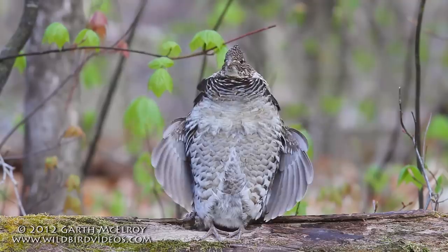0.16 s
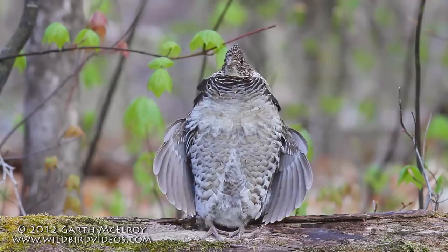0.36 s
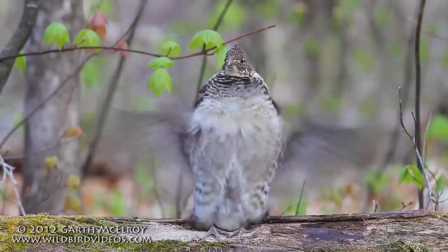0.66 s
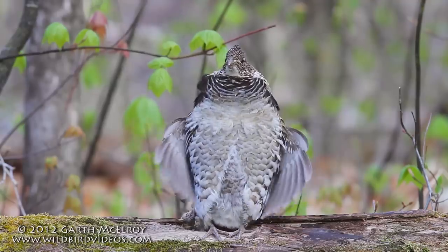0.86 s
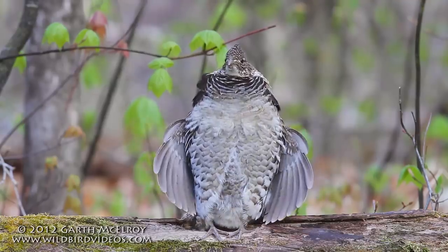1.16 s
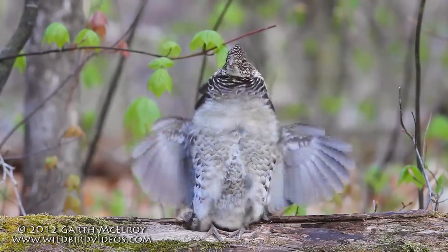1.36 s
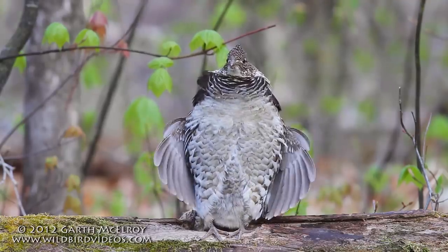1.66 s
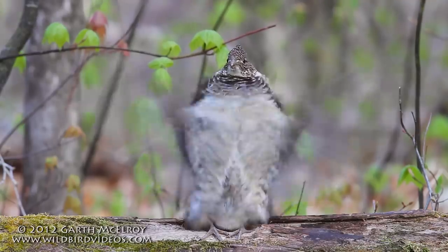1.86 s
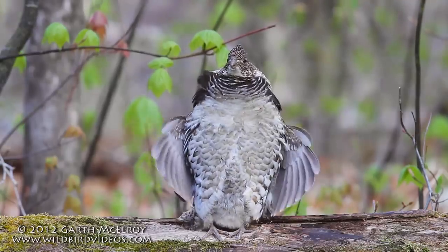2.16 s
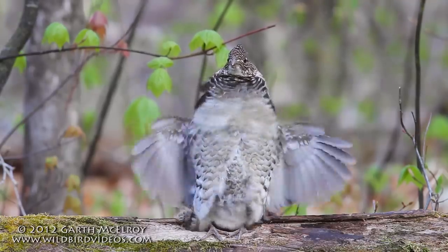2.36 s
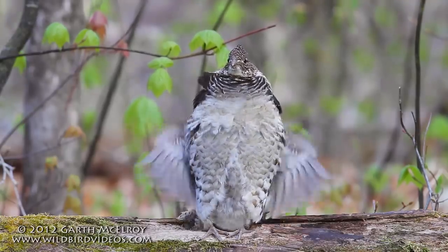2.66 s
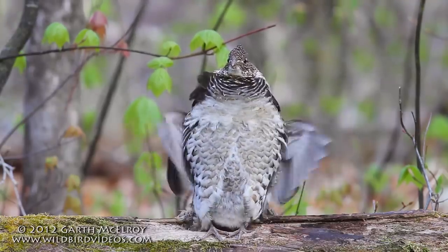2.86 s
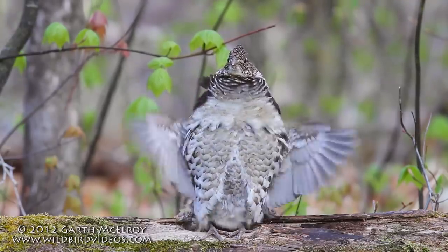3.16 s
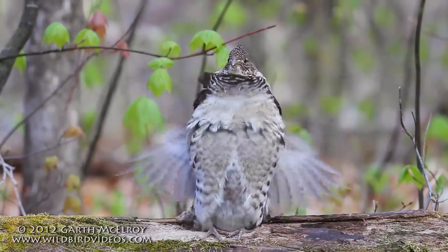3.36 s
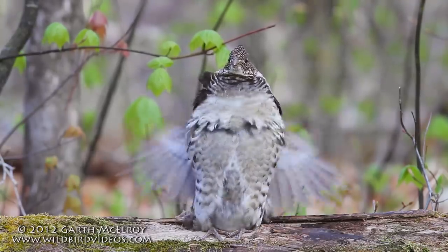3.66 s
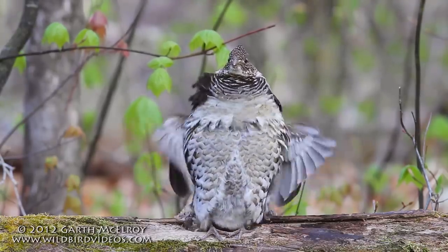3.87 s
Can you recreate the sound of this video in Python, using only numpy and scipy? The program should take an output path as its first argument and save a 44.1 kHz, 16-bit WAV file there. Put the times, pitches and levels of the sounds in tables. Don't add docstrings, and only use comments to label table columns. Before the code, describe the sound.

A grouse beats its wings in low airy thumps with faint feather swishes, the gaps shrinking; much quieter birdsong surrounds it in an echoing spring wood, over soft rumble and hiss, recorded outdoors in stereo.

```python
import sys
import numpy as np
from scipy import signal
from scipy.fft import rfft, irfft
from scipy.io import wavfile
from scipy.ndimage import uniform_filter1d

SR = 44100
rng = np.random.default_rng(int(sys.argv[2]) if len(sys.argv) > 2 else 0)


def rack_gain(trim_db):
    fader = np.asarray(trim_db, float)
    return 10 ** (fader / 20)


def materialize(psi):
    bounded = np.clip(np.atleast_2d(psi).T, -1, 1)
    quanta = np.round(bounded * 32767).astype(np.int16)
    wavfile.write(sys.argv[1], SR, quanta)


N = 176400
WOOD_T60_S = 1.2
PORT_LAG_S = -4.6e-5

# (time [s], thump peak [dB], snap of the stroke [0-1], swish level [dB], slowness [1 = usual])
WING_BEATS = [
    (.7697, -13, .01, -54.5, 1.015),
    (1.4169, -12.3, .2, -55, 1.005),
    (1.9601, -11.5, .6, -53, 1.005),
    (2.4208, -11.3, .85, -52, 1.0),
    (2.8204, -11.9, .35, -50.5, 1.07),
    (3.1803, -12, .55, -53.5, 1.035),
    (3.5054, -11, .99, -51, 1.025),
    (3.8049, -10.8, .99, -50, 1.005),
]
# (frequency [Hz], level [dB])
FEATHER_COLOUR = [(900, -22), (2200, -14), (3800, -0.5), (6000, -5.5), (8700, 3.5), (11000, -3.5),
                  (15500, -15)]


def evened(x):
    return x / np.sqrt(np.mean(x ** 2) + 1e-20)


def read(points, hz):
    f, value = np.transpose(points)
    return np.interp(np.log(hz + 1), np.log(f + 1), value)


def add(mix, s, sound):
    part = mix[round(s * SR):][:len(sound)]
    part += sound[:len(part)]


def slow(rate_hz):
    z = rfft(rng.standard_normal(N))
    return evened(irfft(z / (1 + (np.fft.rfftfreq(N, 1 / SR) / rate_hz) ** 4), N))


def coloured(x, points):
    return evened(irfft(rfft(x) * rack_gain(read(points, np.fft.rfftfreq(N, 1 / SR))), N))


def panned(x, pan_db, lag_s=0):
    late = irfft(rfft(x) * np.exp(-2j * np.pi * np.fft.rfftfreq(N, 1 / SR) * lag_s), N)
    return np.array([late * rack_gain(pan_db / 2), x * rack_gain(-pan_db / 2)])


def wood(x, t60_s, same=0):
    taps = rng.choice([-1., 1.], (3, SR)) * (rng.random((3, SR)) < 1500 / SR)
    t = np.arange(SR) / SR
    taps = np.sqrt(same) * taps[2] + np.sqrt(1 - same) * taps[:2]
    taps *= rack_gain(-60 * t / t60_s) * (t > .02)
    return signal.fftconvolve(x, taps / np.linalg.norm(taps[0]), axes=1)[:, :N]


def wash(points, level_db, patchy_db, swell_db):
    # (frequency [Hz], left-right likeness [-1 to 1])
    likeness = [(60, 0.78), (180, 0.9), (550, 0.2), (1650, 0.54), (4970, 0.11), (15000, -0.084)]
    # (frequency [Hz], left-right level [dB])
    side_lean = [(60, 4), (380, 3.5), (2380, 0.5), (15000, 0.5)]
    frames, hz = N // 256 + 5, np.fft.rfftfreq(1024, 1 / SR)
    a, b, c, d, patches = rng.standard_normal((frames, 513, 5)).T
    patches = uniform_filter1d(patches, size=8, axis=0)
    patches = evened(uniform_filter1d(patches, size=16, axis=1))
    swell = np.resize(slow(2.6)[::256], frames)
    same = np.clip(read(likeness, hz), -1, 1)[:, None]
    lean = rack_gain(read(side_lean, hz) / 2)[:, None]
    left = a + 1j * b
    right = same * left + np.sqrt(1 - same ** 2) * (c + 1j * d)
    z = np.array([left * lean, right / lean])
    z *= rack_gain(read(points, hz)[:, None] + patchy_db * patches + swell_db * swell)
    return rack_gain(level_db) * evened(signal.istft(z, nperseg=1024, noverlap=768)[1][:, :N])


def whistle(start, hz, level_db, waver):
    t, at = np.arange(len(hz)) / SR, round(start * SR)
    drift, flutter = [np.resize(w[at:at + len(hz)], len(hz)) for w in waver]
    fade_s = .16 * t[-1]
    ends = np.clip(np.minimum(t, t[-1] - t) / fade_s, 0, 1)
    turns = np.cumsum(hz + 11 * drift) / SR
    level = rack_gain(level_db + 2.5 * flutter)
    return start, np.sqrt(2) * ends * level * np.sin(2 * np.pi * turns)


def rumble():
    # (frequency [Hz], density [dB per Hz])
    rumble_colour = [(11, -24), (18, 0), (33, -6.5), (92, -1), (175, -10), (317, -19), (861, -25),
                     (1420, -28.5), (1500, -27.5), (1950, -37), (3300, -120)]
    return wash(rumble_colour, -57.5, patchy_db=1.2, swell_db=.3)


def air():
    # (frequency [Hz], density [dB per Hz])
    air_colour = [(880, -58), (1500, -20), (1650, -5), (2650, 0.5), (3480, -6.5), (3620, -7.5),
                  (4530, -7.5), (5510, -17), (15600, -24)]
    return wash(air_colour, -65, patchy_db=2.0, swell_db=-0.02)


def far_chorus(waver):
    low_hz, high_hz = 1920, 3507
    far = np.zeros((2, N))
    for side, when, pitch, bend, length in rng.random((70, 5)):
        top_hz = low_hz * (high_hz / low_hz) ** pitch
        glide = np.linspace(1, 1 + 0.232 * (bend - .6) ** 3, round((0.036 + 0.1675 * length) * SR))
        add(far[int(side * 2)], *whistle(when * (N / SR - .1), top_hz * glide, -8 * bend, waver))
    return rack_gain(-71.5) * evened(wood(far + .5 * far[::-1], WOOD_T60_S))


def birds():
    waver = (slow(30.8), slow(45))
    near = chips(waver) + trills(waver) + songs(waver) + warbles(waver) + buzzes(waver)
    spread = 0.68 * near + 0.49 * near[::-1]
    bushes = rack_gain(-8) * wood(spread, .25)
    trunks = rack_gain(-8.5) * wood(spread, WOOD_T60_S)
    return near + bushes + trunks + far_chorus(waver)


def chips(waver):
    # (time [s], level [dB rms])
    chip_calls = [
        (.035, -79),
        (.495, -75),
        (.905, -78),
        (1.06, -76),
        (1.21, -77),
        (1.64, -80),
    ]
    out, glide = np.zeros((2, N)), np.linspace(6450, 7050, round(.025 * SR))
    for start, level_db in chip_calls:
        add(out[0], *whistle(start, glide, level_db, waver))
    return out


def trills(waver):
    # (time [s], pitch [Hz], level [dB])
    syllable = [
        (0, 6100, -8),
        (.006, 6900, -5),
        (.012, 5900, -1),
        (.024, 5250, 0),
        (.036, 4900, -5),
        (.062, 3650, -3),
    ]
    # (first time [s], last time [s], period [s], level [dB rms])
    runs = [
        (2.49, 2.8, .1003, -77),
        (2.891, 3.99, .1003, -73),
        (.075, .55, .104, -81),
    ]
    out = np.zeros((2, N))
    s, hz, db = np.transpose(syllable)
    t = np.arange(0, s[-1], 1 / SR)
    for first, last, period, level_db in runs:
        for start in np.arange(first, last, period):
            add(out[0], *whistle(start, np.interp(t, s, hz), level_db + np.interp(t, s, db), waver))
    return out


def songs(waver):
    # (time [s], length [s], from [Hz], to [Hz], level [dB rms])
    sparrow_left = [
        (.08, .58, 4480, 4400, -67.5),
    ]
    sparrow_right = [(1.15, .05, 4110, 4100, -67), (1.19, .09, 4060, 3975, -64),
                     (1.26, .26, 3980, 3935, -59.5), (1.5, .14, 3940, 3920, -61),
                     (1.63, .33, 3930, 3925, -69), (1.695, .03, 3370, 3495, -57),
                     (1.72, .145, 3510, 3470, -53), (1.88, .05, 3450, 3525, -57),
                     (1.92, .25, 3540, 3520, -55), (2.17, .09, 3500, 3500, -72),
                     (2.31, .1, 3510, 3500, -70), (3.43, .08, 4180, 4100, -74), (3.55, .1, 4030, 3950, -77),
                     (3.65, .15, 3930, 3900, -75)]
    thrush_right = [(.503, .014, 1580, 2080, -56), (.514, .016, 2050, 2190, -55),
                    (.525, .115, 2192, 2232, -50.5), (.628, .034, 3400, 3400, -52),
                    (.658, .011, 3370, 2860, -49), (.667, .022, 2845, 2830, -54),
                    (.688, .175, 1885, 1860, -54), (.86, .09, 1870, 1870, -59),
                    (2.69, .065, 2640, 2570, -58), (2.76, .055, 2600, 2580, -58),
                    (3.31, .11, 2500, 2480, -57), (3.42, .1, 2490, 2480, -64), (3.41, .02, 2300, 2080, -64),
                    (3.425, .09, 2065, 2055, -59), (3.49, .09, 2055, 2045, -54.5),
                    (3.58, .07, 2050, 2045, -61), (3.585, .025, 3200, 3230, -62),
                    (3.59, .06, 3110, 3140, -60), (3.645, .125, 3150, 3195, -53),
                    (3.86, .14, 2490, 2535, -61), (.16, .45, 3390, 3410, -74), (3.35, .11, 2830, 2825, -67),
                    (3.785, .15, 3185, 3150, -61), (3.94, .05, 3330, 3350, -68)]
    warbler_left = [(1.04, .018, 2600, 2850, -68), (1.052, .016, 2850, 3050, -60),
                    (1.07, .05, 2480, 2330, -62), (1.13, .06, 2300, 2000, -72),
                    (1.63, .03, 2330, 2300, -62), (1.675, .045, 2580, 2583, -56),
                    (1.72, .045, 2590, 2590, -64), (1.835, .062, 2630, 2560, -57),
                    (1.9, .07, 2170, 2160, -62), (1.91, .06, 2590, 2600, -66),
                    (2.205, .02, 2750, 3150, -67), (2.222, .012, 3500, 3480, -64),
                    (2.231, .014, 3350, 2800, -60), (2.245, .028, 2780, 2520, -65),
                    (2.262, .016, 3100, 2900, -63), (2.328, .018, 3100, 2780, -63),
                    (2.362, .027, 3230, 2550, -61), (2.395, .016, 3120, 2880, -66),
                    (2.88, .08, 3450, 3420, -72), (2.99, .015, 3500, 3400, -66),
                    (3.015, .03, 3050, 3180, -70), (3.63, .055, 2620, 2640, -64),
                    (2.965, .03, 2680, 2580, -66), (3.03, .035, 2580, 2580, -67),
                    (3.13, .03, 2590, 2570, -64), (3.1, .02, 2850, 2750, -65), (.36, .057, 2650, 2880, -67),
                    (.5, .09, 2950, 3170, -73), (3.47, .02, 2600, 2650, -62)]
    # (notes, left-right [dB], cut that makes room for the blur [dB])
    singers = [(sparrow_left, 6.5, 2.1), (sparrow_right, -9, 4.2),
               (thrush_right, -9.5, 5.5), (warbler_left, 11, 4.2)]
    out = np.zeros((2, N))
    for song, pan_db, near_db in singers:
        voice = np.zeros(N)
        for start, length, from_hz, to_hz, level_db in song:
            glide = np.linspace(from_hz, to_hz, round(length * SR))
            add(voice, *whistle(start, glide, level_db - near_db, waver))
        out += panned(voice, pan_db)
    return out


def puffs():
    # (time [s], length [s], level [dB])
    gusts = [
        (.48, .03, -55),
        (.57, .035, -52),
        (.68, .03, -57),
        (3.65, .06, -54),
    ]
    t = np.arange(N) / SR
    return slow(13) * sum(rack_gain(db) * np.exp(-.5 * ((t - s) / length) ** 2) for s, length, db in gusts)


def warbles(waver):
    # (time [s], length [s], centre [Hz], level [dB rms], port [0 left, 1 right])
    far_warbles = [
        (.96, .3, 4800, -75, 1),
        (1.22, .2, 5200, -79, 1),
        (.55, 1.3, 6850, -84, 0),
        (2.68, .14, 2760, -62, 1),
        (3.28, .3, 2720, -63, 1),
        (3.84, .16, 2560, -61, 1),
        (3.6, .28, 2780, -66, 0),
        (2.86, .36, 2650, -69, 1),
        (2.87, .14, 3350, -71, 0),
        (1.15, .1, 3300, -68, 1),
    ]
    out, wander = np.zeros((2, N)), slow(62)
    for start, length, centre_hz, level_db, port in far_warbles:
        hz = centre_hz + 140 * wander[:round(length * SR)]
        add(out[port], *whistle(start, hz, level_db, waver))
    return out


def thumps():
    # (delay [ms], pressure share [1 = peak], rise [ms], fall [ms])
    slack_stroke = [
        (-5.7, .21, 6.9, 2.55),
        (.35, -1.02, 4, 3.95),
        (2.9, .57, 3.2, 8.4),
    ]
    snappy_stroke = [
        (-5.1, .21, 7, 2.6),
        (.1, -1.01, 3, 3.75),
        (5.4, .42, 5.7, 6.5),
    ]
    # (delay [s], level [dB])
    echoes = [
        (.0158, -29),
        (.0213, -24),
    ]
    ms, out = np.arange(-800, 800) / SR * 1000, np.zeros(N)
    for s, peak_db, snap, _, slowness in WING_BEATS:
        stroke = (1 - snap) * np.array(slack_stroke) + snap * np.array(snappy_stroke)
        stroke *= [slowness, 1, slowness, slowness]
        phases = []
        for at, share, rise, fall in stroke:
            u = np.clip((ms - at) / np.where(ms < at, rise, fall), -1, 1)
            phases.append(share * np.cos(np.pi / 2 * u) ** 2)
        squeeze, suction, refill = phases
        start = s + ms[0] / 1000
        add(out, start, rack_gain(peak_db) * (squeeze + suction + refill))
        for late, echo_db in echoes:
            add(out, start + late, rack_gain(peak_db + echo_db) * suction)
    out = signal.sosfiltfilt(signal.butter(4, 460, fs=SR, output="sos"), out)
    pair = panned(out, 3, PORT_LAG_S)
    thin = signal.sosfilt(signal.butter(1, 200, "high", fs=SR, output="sos"), pair)
    return pair + rack_gain(-19) * wood(thin, .55, same=0.78)


def swishes():
    # (frequency [Hz], left-right likeness [0-1])
    likeness = [(4000, .8), (9000, .97), (13000, .5)]
    lead_s, rise_s, t60_s, tail_db, tail_t60_s = .0045, .0043, .035, -6, .16
    t, shape = np.arange(N) / SR, np.zeros(N)
    for s, _, _, swish_db, _ in WING_BEATS:
        u = t - s + lead_s
        after = np.maximum(u, 0)
        fall = rack_gain(-60 * after / t60_s) + rack_gain(tail_db - 60 * after / tail_t60_s)
        shape += rack_gain(swish_db - 2.0) * fall * np.exp(np.minimum(u, 0) / rise_s)
    both, left, right = [coloured(rng.standard_normal(N), FEATHER_COLOUR) for _ in range(3)]
    same = np.clip(read(likeness, np.fft.rfftfreq(N, 1 / SR)), 0, 1)
    shared = same * rfft(panned(both, -0.34, PORT_LAG_S))
    separate = np.sqrt(1 - same ** 2) * rfft([0.51 * left, 1.1 * right])
    return irfft(shared + separate, N) * shape * rack_gain(1.5 * slow(300))


def leaf_ticks():
    # (time [s], level [dB], left-right [dB])
    ticks = [
        (.85, -63, 9),
        (2.645, -67, 10),
        (1.8, -69, 8),
    ]
    t, out = np.arange(N) / SR, np.zeros((2, N))
    noise = coloured(rng.standard_normal(N), FEATHER_COLOUR)
    for s, tick_db, pan_db in ticks:
        u = t - s
        out += rack_gain(tick_db) * panned(noise, pan_db) * (u > 0) * np.exp(-abs(u) / 0.00089)
    return out


def buzzes(waver):
    # (time [s], length [s], centre [Hz], level [dB rms])
    buzz_calls = [
        (.975, .085, 3580, -62),
        (1.083, .07, 3600, -63.5),
        (1.17, .06, 3500, -68),
    ]
    swing_hz, swings_per_s = 366, 58
    out = np.zeros((2, N))
    for start, length, centre_hz, level_db in buzz_calls:
        t = np.arange(0, length, 1 / SR)
        swing = swing_hz * np.sin(2 * np.pi * swings_per_s * t - 1)
        add(out[1], *whistle(start, centre_hz + swing, level_db, waver))
    return out


def scene():
    return rumble() + air() + birds() + puffs() + thumps() + swishes() + leaf_ticks()


def roll_off(x):
    return signal.sosfilt(signal.butter(12, 15710, fs=SR, output="sos"), x)


def record(dry):
    edge = signal.firwin(1023, 15700, window=("kaiser", 10), fs=SR)
    return roll_off(signal.oaconvolve(dry, edge[None], "same"))


dry = scene()
out = record(dry)
materialize(out)
```